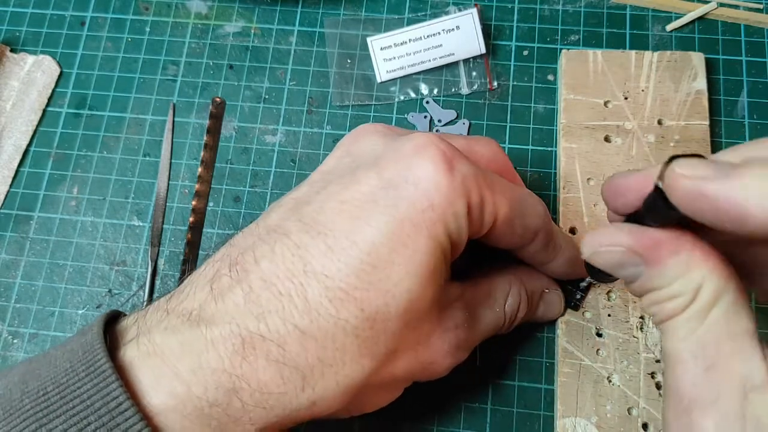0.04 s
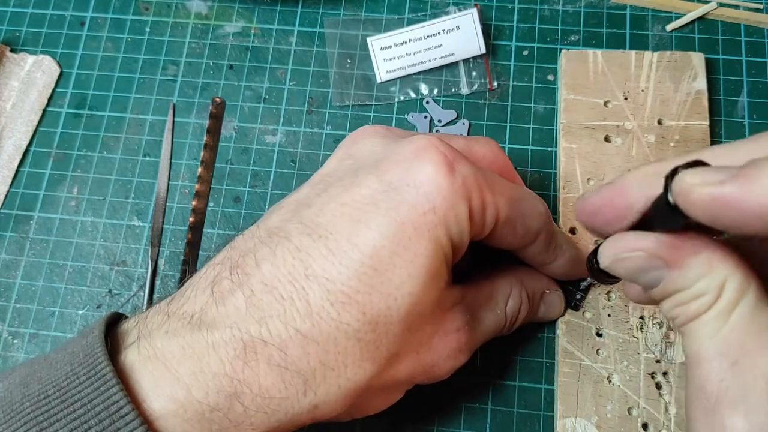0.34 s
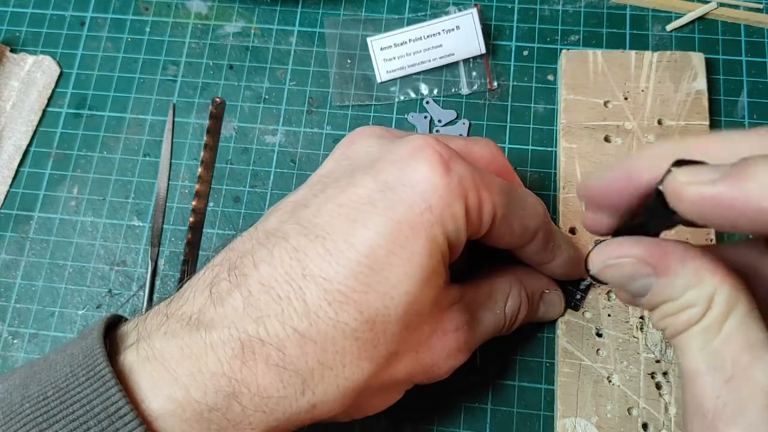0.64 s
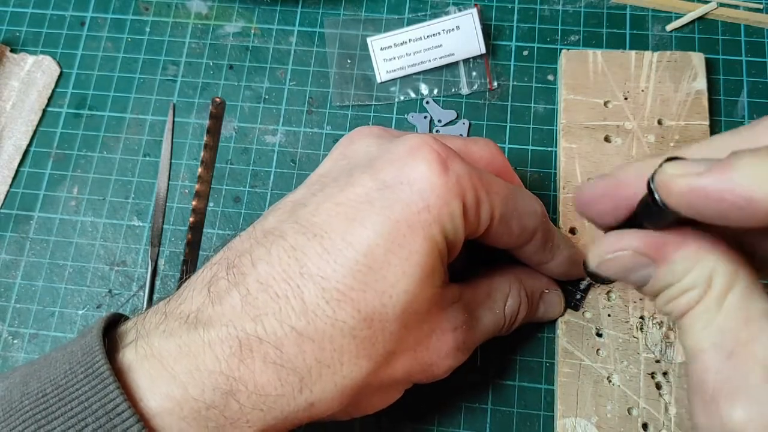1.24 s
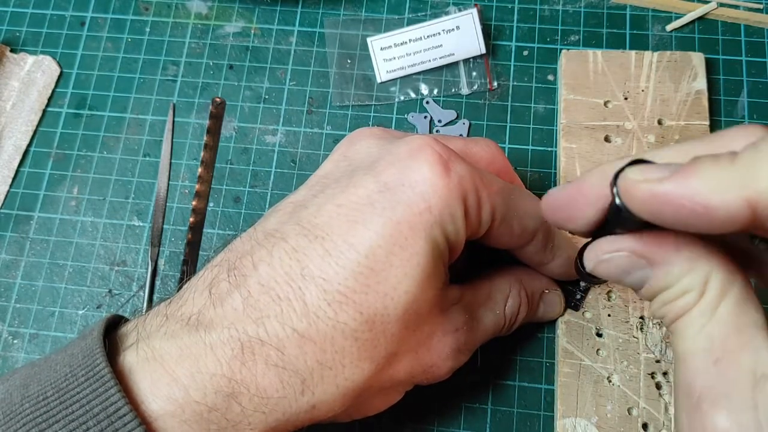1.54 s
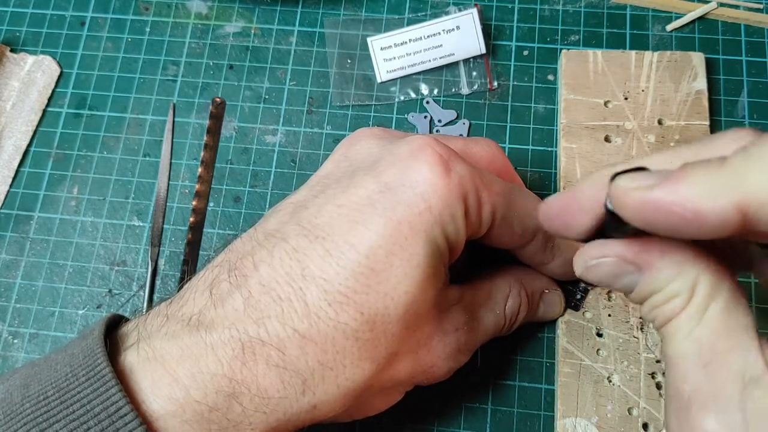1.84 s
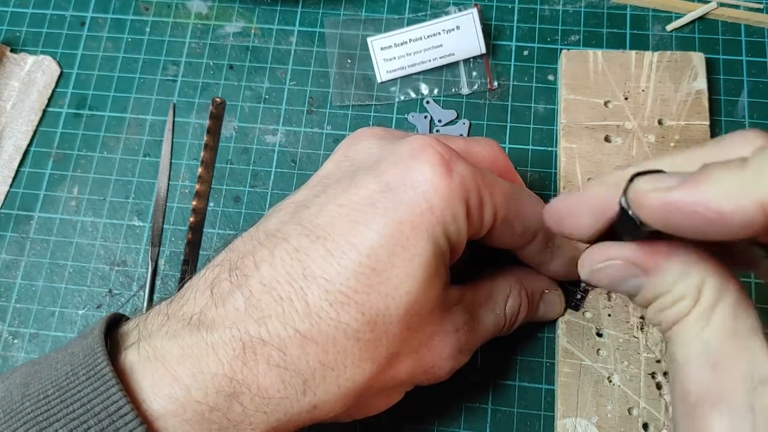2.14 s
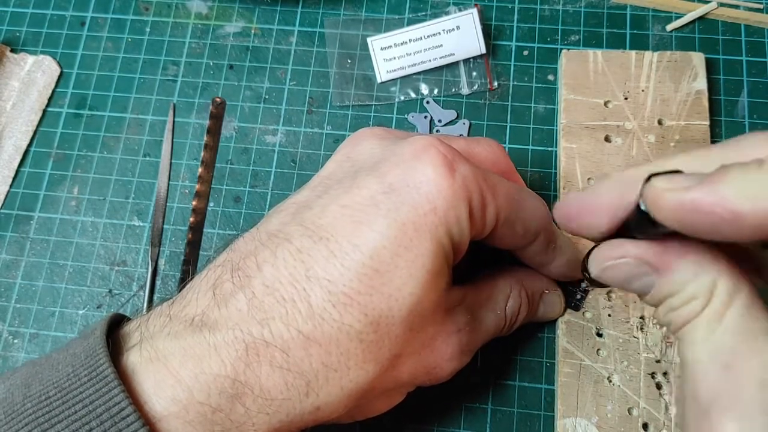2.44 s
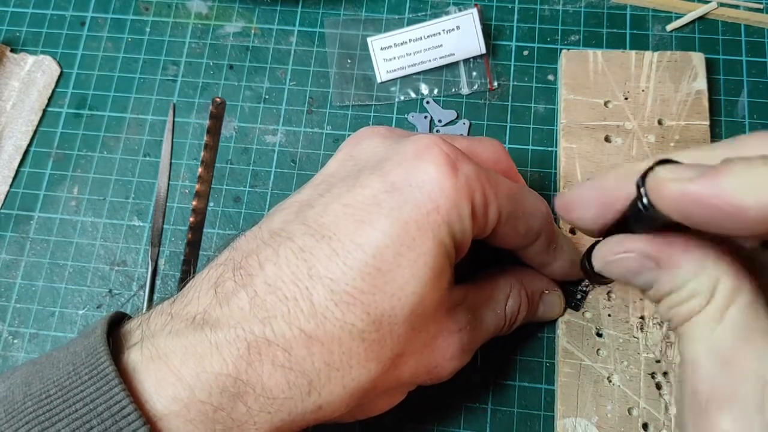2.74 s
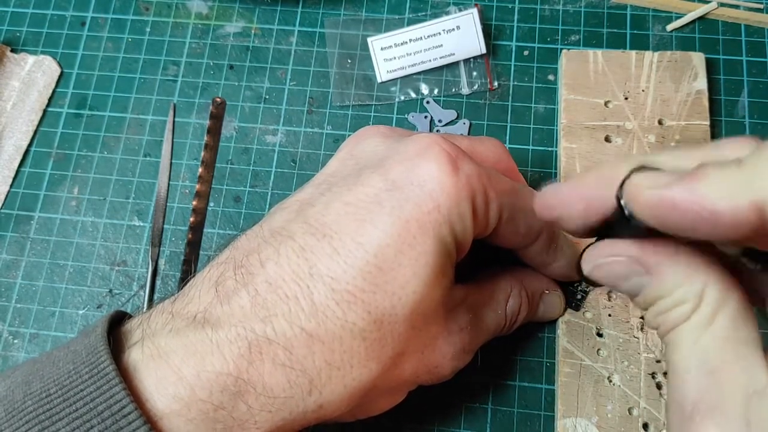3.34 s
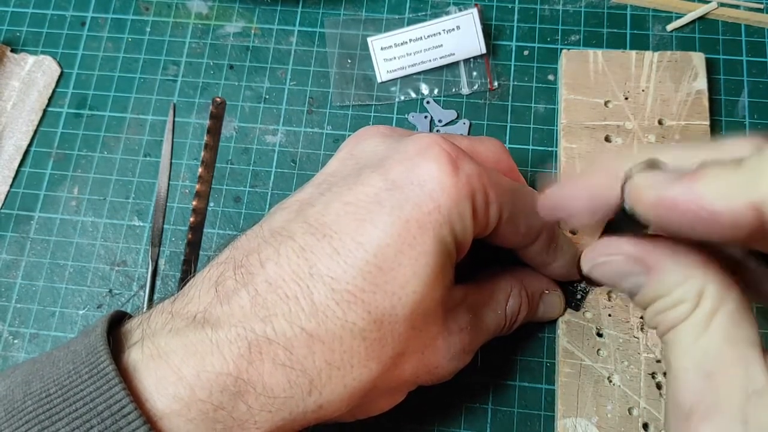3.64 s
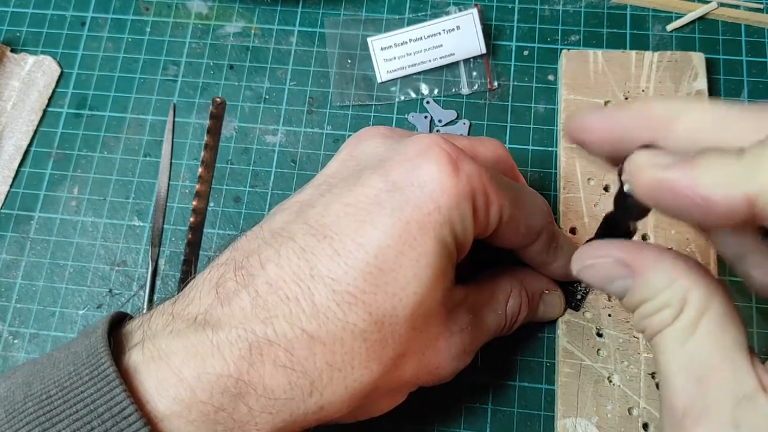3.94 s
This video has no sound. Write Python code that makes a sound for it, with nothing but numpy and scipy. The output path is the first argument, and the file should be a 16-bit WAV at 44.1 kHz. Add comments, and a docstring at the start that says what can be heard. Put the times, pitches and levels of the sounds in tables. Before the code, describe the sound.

Quick scraping turns of a tiny hand drill, with sharp clicks and a faint electrical buzz.

```python
"""Fingers twist a small hand drill into a tiny part on a wooden block, about three turns a second.
The first turns scrape faintly, the edge catches with ticks, and near 0.8 s the part gives its loudest
knock. From 1.2 s the friction is louder: a fine, bright scrape over the block's dull rub, with more
ticks and, after 2.4 s, a few lighter knocks. Throughout, the grip rustles in a quiet small room,
over mains hum and the faint ticking and sputter of electronics."""
import sys
import numpy as np
from scipy import signal
from scipy.fft import rfft, irfft
from scipy.io import wavfile

SR = 44100
rng = np.random.default_rng(int(sys.argv[2]) if len(sys.argv) > 2 else 0)


def file_out(sig):
    """Save sig as 16-bit WAV at sys.argv[1]."""
    # one column per channel
    cols = np.atleast_2d(sig).T
    # limit, then scale
    lim = np.clip(cols, -1, 1)
    pcm = np.round(lim * 32767).astype(np.int16)
    wavfile.write(sys.argv[1], SR, pcm)


N = 176400

GRAINS_PER_S, GRAIN_SPREAD_DB, JUDDER_DB, JUDDER_S = 8000, 2.3, 1.8, .0022
SCATTER = 0.8  # share of the grains' power that reaches each side by its own path
BODY_HZ, BODY_WIDTH_HZ, BODY_DB = 3210, 180, -16.5  # the part's main resonance
# Spectra of the cutting edge, heard left and right, and of the block's rub: f/Hz, level/dB
EDGE_LEFT = [(500, -17), (1500, -10), (2500, -15), (3200, -14), (3700, -14.5), (5500, -15.5), (6200, -11),
             (6850, -19), (7200, -6.5), (7750, -4), (8350, 1.5), (9150, -7.5), (10200, -24.5), (15000, -42)]
EDGE_RIGHT = [(500, -20), (1500, -22), (2500, -14.5), (3200, -13), (3700, -15.5), (5400, -13),
              (6200, -11.5), (6800, -1.5), (7250, 0.5), (7900, -4.5), (8600, -13.5), (9200, -22),
              (10000, -20), (15000, -36.5)]
BLOCK_SPECTRUM = [(60, -14), (180, -8), (480, 6), (700, -2), (1100, -10.5), (2200, -21), (5000, -42)]
# Pushes of the drill, one or two a turn:
# start t/s, hardest t/s, end t/s, build-up/dB, scrape level/dB, rub level/dB, left minus right/dB
PUSHES = [(.116, 0.15, .16, 6, -59, -61, -1), (0.274, 0.32, .335, 7, -52.5, -49.5, -3),
          (0.576, 0.624, 0.61, 14, -58, -64, -8), (0.834, 0.84, 0.938, -8, -54, -60, -4),
          (1.17, 1.191, 1.25, 4, -44, -47.5, -2), (1.241, 1.26, 1.29, 8, -52.5, -51.5, -3),
          (1.512, 1.52, 1.54, 8, -50.5, -53, -4), (1.556, 1.574, 1.58, 6, -47.5, -50, -3),
          (1.812, 1.812, 1.87, 0, -47, -51, 0.5), (1.857, 1.869, 1.927, 16, -42, -46.5, 0),
          (2.071, 2.092, 2.17, 8, -53, -52.5, -2), (2.125, 2.17, 2.16, 6, -42, -56, 0),
          (2.409, 2.434, 2.455, 13, -45, -51, 2), (2.452, 2.487, 2.502, 9, -40, -69, 0),
          (2.72, 2.738, 2.78, -1, -49, -52.5, 0), (2.757, 2.786, 2.8, 9, -38, -55.5, -3),
          (3.033, 3.07, 3.14, 5, -44.5, -51.5, 0.5), (3.33, 3.35, 3.39, 5, -50.5, -50, 1),
          (3.382, 3.409, 3.413, 9, -38, -68, 1), (3.652, 3.67, 3.796, 6, -45.5, -46.5, 0)]
def scraping():
    """Friction noise: the edge tears off grains that drive the part's resonance; the block rubs dully."""
    forces = np.array([push_force(*row[:4]) for row in PUSHES])
    scrape_db, rub_db, pan_db = np.transpose(PUSHES)[4:]
    sizes = amp(GRAIN_SPREAD_DB * np.minimum(rng.exponential(1, N), 4))
    sizes *= rng.random(N) < GRAINS_PER_S / SR
    paths = rng.standard_normal((3, N))  # common, left, right
    grains = sizes * (np.sqrt(1 - SCATTER) * paths[0] + np.sqrt(SCATTER) * paths[1:])
    judder = unit_rms(amp(JUDDER_DB * wander(JUDDER_S)))
    envelope = amp([scrape_db + pan_db / 2, scrape_db - pan_db / 2]) @ forces
    scrape = unit_rms(grains) * judder * envelope
    t = np.arange(SR // 25) / SR
    ring = np.exp(-np.pi * BODY_WIDTH_HZ * t) * np.sin(2 * np.pi * BODY_HZ * t)
    body = amp(BODY_DB) * signal.oaconvolve(scrape.mean(axis=0), ring / np.linalg.norm(ring))[:N]
    rub = colour(rng.standard_normal(N) * judder * (amp(rub_db) @ forces), BLOCK_SPECTRUM)
    return edge_colour(scrape) + body + rub * pan(3)


def push_force(start, hardest, end, build_db, fall_db=17, ramp_s=0.0028):
    """Amplitude envelope: the force of one push builds to its hardest moment, then lets go."""
    t = np.arange(N) / SR
    gate = np.clip(np.minimum(t - start, end - t) / ramp_s + 1, 0, 1)
    before, after = np.interp(t, [start, hardest], [1, 0]), np.interp(t, [hardest, end], [0, 1])
    return gate * amp(-build_db * np.sin(np.pi / 2 * before) ** 2 - fall_db * after ** 2)


def edge_colour(x):
    """Source and filter: the sound of the edge reaches each side with its own spectrum."""
    return np.array([colour(x[0], EDGE_LEFT), colour(x[1], EDGE_RIGHT)])


SNAP_DB, SNAP_PEAK_S, SNAP_WIDTH_S, CHATTER_DB, CHATTER_S = -6.5, .0014, 0.00056, -5, 0.0039
BIT_HZ, BIT_T60_S, BIT_PAN_DB, BIT_DETUNE = 7150, 0.026, -8, 0.0091
CREAKS_PER_S, CREAK_DB = 14, -50.5
# Catches of the edge: t/s, snap level/dB, left minus right/dB, bit ring level/dB
CATCHES = [(.1184, -45, -7, -60), (.193, -37.5, -8, -52), (.2024, -35.5, 8, -52), (.305, -45.5, -4, -58),
           (.4237, -36, -10, -37), (.4718, -46, -10, -60), (.7505, -34, -4.5, -42), (.7879, -22, -3.5, -36),
           (1.1644, -37, 1, -55), (1.3034, -46, -9, -50), (1.5102, -40, -2, -59), (1.5165, -40, 1, -57),
           (1.8092, -39, -9, -37.5), (2.126, -40, 3, -55), (2.2871, -45, -1, -64), (2.425, -35, -8, -46),
           (2.4642, -36, 7, -49), (2.5945, -36, 6, -62), (2.6942, -41.5, 2, -60), (2.7209, -37, 1, -51),
           (2.9892, -43, -10, -54), (3.0005, -41, 8, -56), (3.019, -30.5, 2, -36), (3.049, -35, 6, -48),
           (3.131, -50, -5, -49), (3.3361, -41, -14, -55), (3.3934, -39, 1, -39), (3.5126, -44, -6, -57),
           (3.608, -43, -11, -54), (3.6478, -33.5, 4, -52), (3.6702, -42, -3, -52),
           (3.7297, -31.5, -7, -39)]
def ticks():
    """Impulse excitation: each catch snaps, chatters and rings the steel bit; tiny creaks fall between."""
    snaps, rings, t = np.zeros((2, N)), np.zeros(N), np.arange(SR // 25) / SR
    late = t - SNAP_PEAK_S
    chatter = amp(CHATTER_DB) * np.exp(-abs(late) / CHATTER_S) * (late > 0)
    snap_shape = amp(SNAP_DB) * (np.exp(-(late / SNAP_WIDTH_S) ** 2) + chatter)
    ring_shape = np.minimum(t / SNAP_PEAK_S, 1) ** 2 * decay(t, BIT_T60_S)
    creak_times = np.flatnonzero(rng.random(N) < CREAKS_PER_S / SR) / SR
    creaks = [(s, CREAK_DB, -2, -np.inf) for s in creak_times]  # snaps with no ring
    for s, db, pan_db, ring_db in list(CATCHES) + creaks:
        add(snaps, s, amp(db) * pan(pan_db) * snap_shape * rng.choice([-1., 1.], len(t)))
        hz = BIT_HZ * (1 + BIT_DETUNE * rng.standard_normal())  # the grip shifts the pitch a little
        add(rings, s + SNAP_PEAK_S / 2, amp(ring_db) * ring_shape * np.sin(2 * np.pi * hz * t))
    return edge_colour(snaps) + rings * pan(BIT_PAN_DB)


# Modes of the part: f/(main mode f), level/dB, T60/s
PART_MODES = [(.68, -12, 0.017), (.87, -7.5, .016), (1, 1, 0.019), (1.26, -13, .012), (1.44, -18, 0.042),
              (1.75, -9, 0.021), (2.23, -14.5, 0.019)]
# Impacts of the part on the block: t/s, level/dB, main mode f/Hz
IMPACTS = [(0.428, -41.5, 3060), (.7517, -45, 3190), (.79, -25.5, 3160), (2.4648, -52, 3130),
           (2.598, -37, 4080), (3.099, -44, 4270), (3.731, -34, 3010)]
def knocks(rise_s=0.0014):
    """Damped free vibration: the part snaps against the block, and the fingers damp its modes."""
    out, t = np.zeros(N), np.arange(SR // 10) / SR
    for s, db, hz in IMPACTS:
        ring = sum(amp(mode_db) * decay(t, t60) * np.sin(2 * np.pi * (hz * ratio * t + rng.random()))
                   for ratio, mode_db, t60 in PART_MODES)
        add(out, s, amp(db) * np.minimum(t / rise_s, 1) * ring)
    return out


# Spectrum of sliding skin and sleeve: f/Hz, level/dB
RUSTLE_SPECTRUM = [(200, -13), (700, 0), (1300, 3), (1900, 2.5), (2600, -3), (4000, -15.5), (8000, -24),
                   (15000, -36)]
# Shifts of the grip: start t/s, end t/s, level/dB
GRIP_SHIFTS = [(-0.005, 0.547, -53.5), (0.567, 0.804, -59), (0.883, 1.203, -55.5), (1.135, 2.013, -54.5),
               (1.896, 2.244, -55.5), (2.7, 3.004, -53), (2.863, 3.387, -57), (3.64, 4.03, -56)]
def rustle(waver_db=1.2):
    """Sliding friction: the noise of skin and sleeve swells and fades with each shift of the grip."""
    t = np.arange(N) / SR
    speed = sum(amp(db) * np.sin(np.pi * np.clip((t - start) / (end - start), 0, 1))
                for start, end, db in GRIP_SHIFTS)
    return colour(rng.standard_normal(N) * speed * amp(waver_db * wander(0.027)), RUSTLE_SPECTRUM)


# Reverberation time of the small room: f/Hz, T60/s
REVERB_TIMES = [(300, 0.057), (3000, 0.093), (8000, 0.11), (15000, 0.1)]
def room(x, tail_db=-5.5, early_db=-7, early_decay_s=0.0091):
    """Reverberation: early reflections from bench and hands, then a short diffuse tail."""
    t = np.arange(SR // 2) / SR
    noise = rng.standard_normal((2, len(t)))
    hz, times, spectra = signal.stft(noise, SR, nperseg=256)
    spectra *= decay(times, lookup(REVERB_TIMES, hz)[:, None])
    tail = signal.istft(spectra, SR)[1][:, :len(t)] * np.minimum(t / 0.0067, 1)
    early = rng.choice([-1., 1.], noise.shape) * (rng.random(noise.shape) < .06)
    early *= np.exp(-t / early_decay_s) * (t > .001)
    response = sum(amp(db) * part / np.linalg.norm(part, axis=1, keepdims=True)
                   for db, part in ((tail_db, tail), (early_db, early)))
    return x + signal.fftconvolve(x, response, axes=1)[:, :N]


def electrical_ticking(rate_hz=29.94, first_s=.0273, gap_s=.0018, width_s=.0017, jitter_s=0.00023):
    """Pulse train: the electronics give a slightly uneven double tick about thirty times a second."""
    out = np.zeros(N)
    for s in np.arange(first_s, N / SR, 1 / rate_hz) - width_s / 2:
        for delay_s, db, spread_db in ((0, -35.5, 0.88), (gap_s, -39, 2.0)):
            add(out, rng.normal(s + delay_s, jitter_s), amp(rng.normal(db, spread_db)) * pulse(width_s))
    return out


def electrical_sputter(db=-39.5, base_per_s=45, surge_per_s=260, surge_s=.1, width_s=0.0023):
    """Poisson process: the electronics give random pulses at a rate that surges once a second."""
    out = np.zeros(N)
    from_surge = (np.arange(N) / SR + .5) % 1 - .5
    rate = base_per_s + surge_per_s * np.exp(-(from_surge / surge_s) ** 2)
    for i in np.flatnonzero(rng.random(N) < rate / SR):
        add(out, i / SR, amp(rng.normal(db, 2.2)) * pulse(width_s * rng.lognormal(sigma=0.5)))
    return out


# Spectral density of room air and hiss: f/Hz, relative level/dB
AIR_SPECTRUM = [(10, 10.5), (28, 7), (42, -11), (70, -3), (120, -3.5), (250, -11), (500, -11.5),
                (800, -16.5), (1300, -17), (1950, -16.5), (2600, -22), (2980, -22), (3400, -23),
                (5500, -26), (7400, -26.5), (10000, -29.5), (15500, -31.5)]
# Likeness of that noise on the two sides: f/Hz, correlation coefficient
AIR_CORRELATION = [(30, 0.99), (190, 1), (270, 0.76), (600, 0.88), (1200, 0.99), (2000, 1), (5000, 0.99),
                   (7400, 0.8), (10000, 1), (15000, 1)]
def air(db=-46):
    """Partly coherent noise: steady room air and hiss, nearly the same on both sides."""
    hz = np.fft.rfftfreq(N, 1 / SR)
    mid, side = rfft(rng.standard_normal((2, N))) * amp(lookup(AIR_SPECTRUM, hz))
    correlation = np.clip(lookup(AIR_CORRELATION, hz), -1, 1)
    mid, side = mid * np.sqrt(1 + correlation), side * np.sqrt(1 - correlation)
    return amp(db) * unit_rms(irfft(np.array([mid + side, mid - side]), N))


# Electrical tones: f/Hz, rms level/dB
HUM_TONES = [(50, -48), (119.9, -61.5), (180, -62), (1000, -72.5), (1217, -70), (1997.8, -67.5),
             (2926.7, -69), (2997.6, -74.5), (5853.5, -78), (11707, -93)]
def hum():
    """Line spectrum: mains hum and thin electrical whines are steady sinusoids."""
    t = np.arange(N) / SR
    return sum(np.sqrt(2) * amp(db) * np.sin(2 * np.pi * (hz * t + rng.random())) for hz, db in HUM_TONES)


def amp(db):
    """Amplitude ratio of a level in decibels."""
    return 10 ** (np.asarray(db) / 20)


def pan(db):
    """Left and right gains for a level difference."""
    return amp([[db / 2], [-db / 2]])


def decay(t, t60):
    """Exponential decay by 60 dB in the time t60."""
    return np.exp(-np.log(1000) * t / t60)


def pulse(width_s):
    """One-sided raised-cosine pulse."""
    return np.sin(np.pi * np.arange(0, width_s, 1 / SR) / width_s) ** 2


def unit_rms(x):
    """Normalisation to rms 1."""
    return x / np.sqrt(np.mean(x ** 2) + 1e-20)


def wander(step_s):
    """Random modulation of rms 1, linear between steps."""
    return unit_rms(np.interp(np.arange(N) / SR / step_s, np.arange(N), rng.standard_normal(N)))


def lookup(table, hz):
    """Interpolation on a log-frequency axis."""
    f, value = np.transpose(table)
    return np.interp(np.log(hz + 1), np.log(f + 1), value)


def colour(x, spectrum, size=4096):
    """Minimum-phase filter of unit energy with the given spectral shape."""
    log_gain = np.log(amp(lookup(spectrum, abs(np.fft.fftfreq(size, 1 / SR)))))
    taps = np.fft.ifft(np.exp(np.conj(signal.hilbert(log_gain)))).real[:size // 2]
    return signal.oaconvolve(x, taps / np.linalg.norm(taps))[:N]


def add(mix, start_s, sound):
    """Superposition of a sound on the mix at a given time."""
    part = mix[..., max(round(start_s * SR), 0):][..., :sound.shape[-1]]
    part += sound[..., :part.shape[-1]]


def scene():
    """Superposition of the drill in its room, the hand and the background."""
    knock, exposed = knocks(), amp(-6)  # the fingers partly shield the knocks from the room
    drill = room(scraping() + ticks() + exposed * knock) + (1 - exposed) * knock
    return drill + rustle() + electrical_ticking() + electrical_sputter() + air() + hum()


def record(dry, cutoff_hz=15800, offset=-.137):
    """Band limiting by a low-pass filter, plus the converter's constant offset."""
    lowpass = signal.firwin(511, cutoff_hz, window=("kaiser", 9), fs=SR)
    return signal.oaconvolve(dry, lowpass[None], "same") + offset


dry = scene()
out = record(dry)
file_out(out)
```